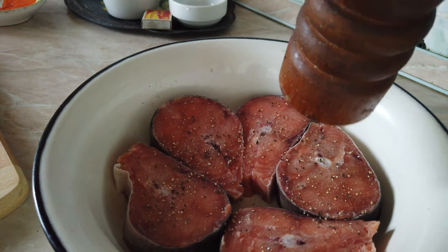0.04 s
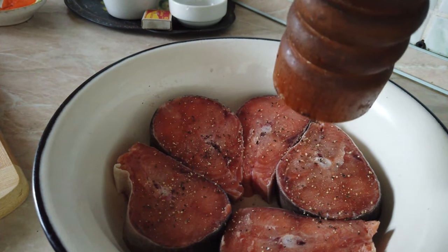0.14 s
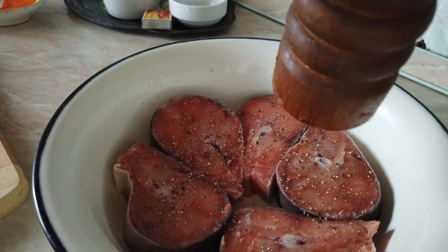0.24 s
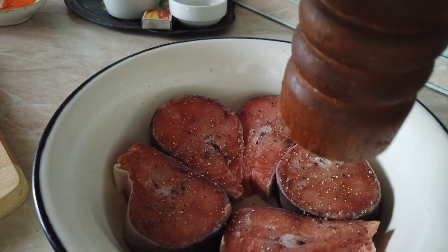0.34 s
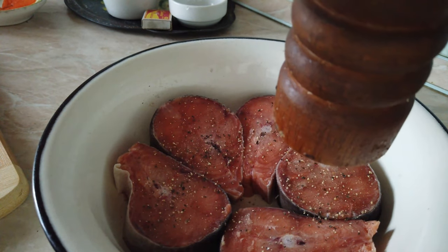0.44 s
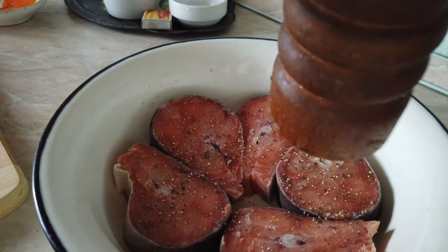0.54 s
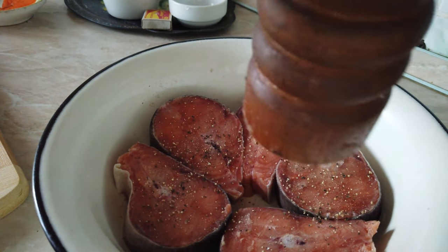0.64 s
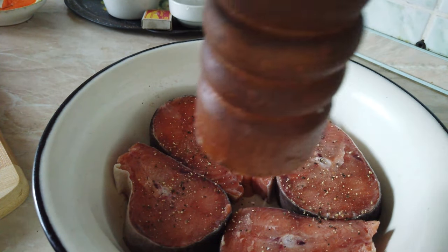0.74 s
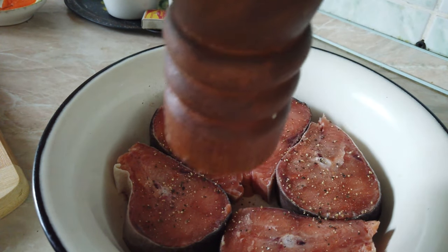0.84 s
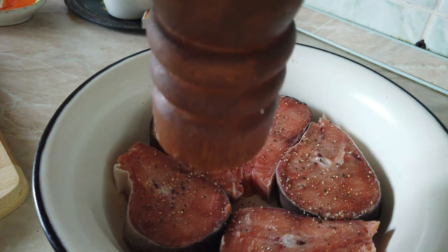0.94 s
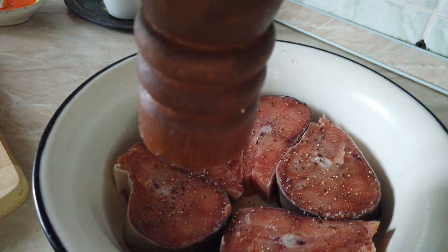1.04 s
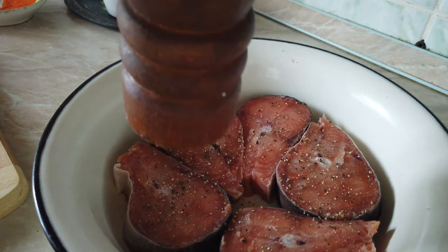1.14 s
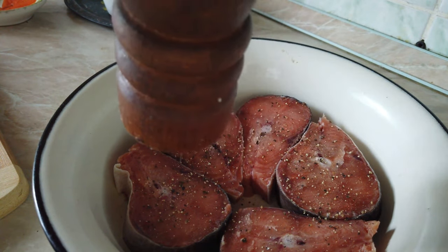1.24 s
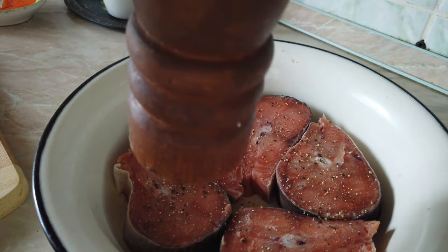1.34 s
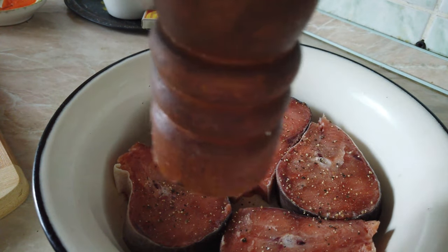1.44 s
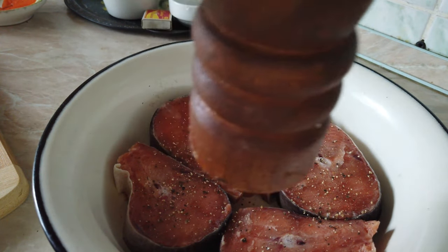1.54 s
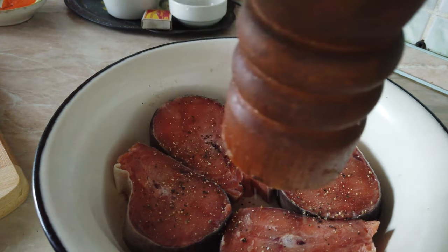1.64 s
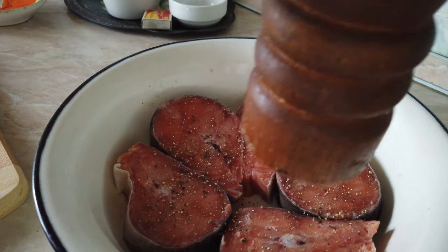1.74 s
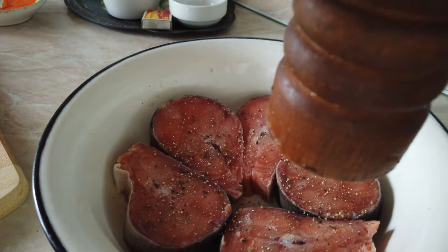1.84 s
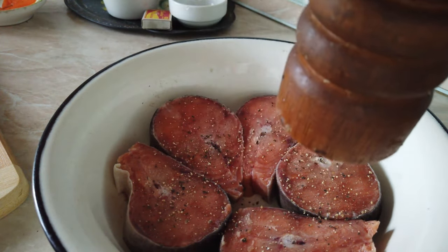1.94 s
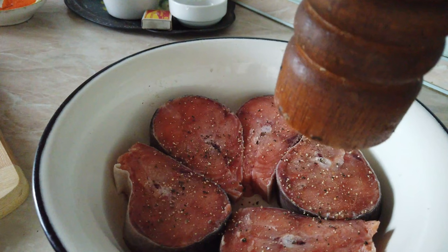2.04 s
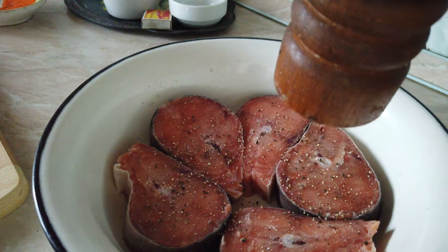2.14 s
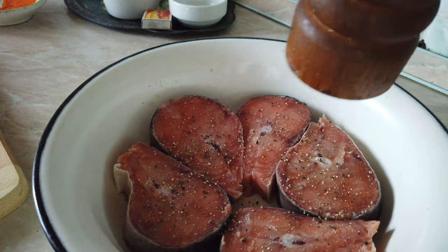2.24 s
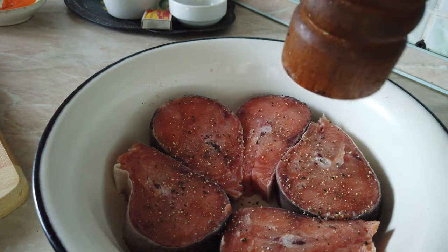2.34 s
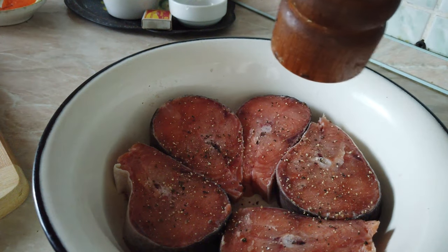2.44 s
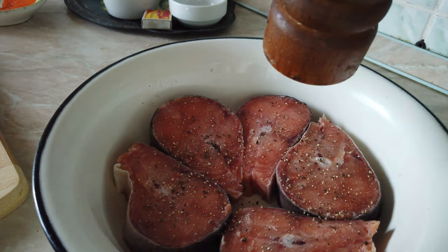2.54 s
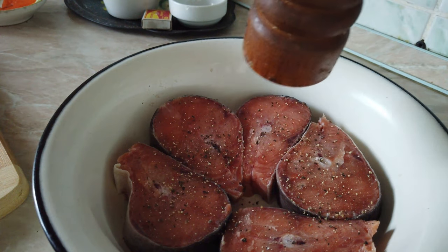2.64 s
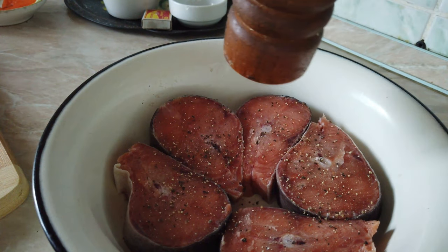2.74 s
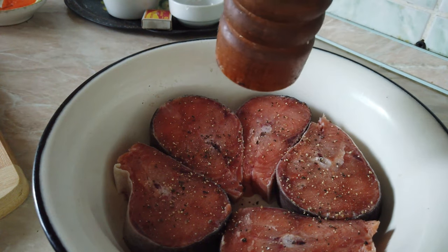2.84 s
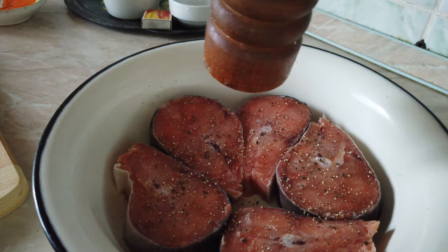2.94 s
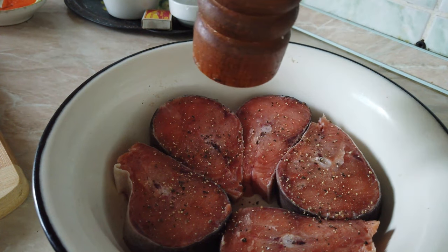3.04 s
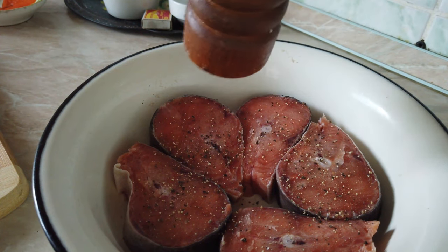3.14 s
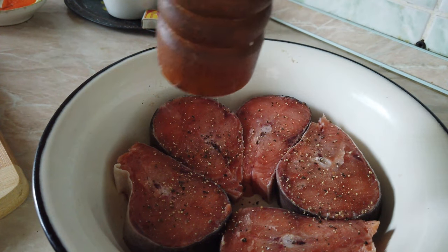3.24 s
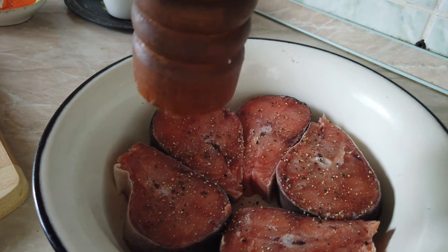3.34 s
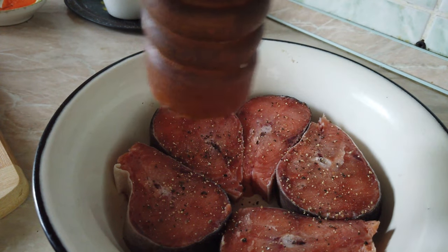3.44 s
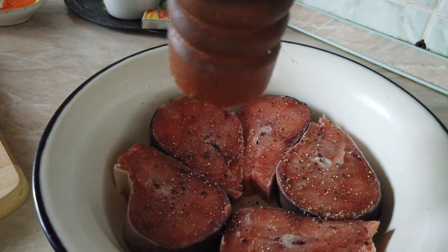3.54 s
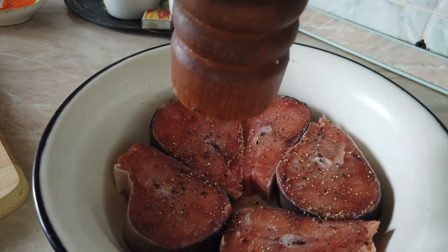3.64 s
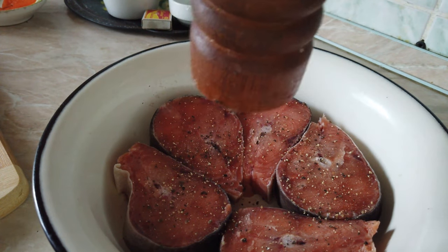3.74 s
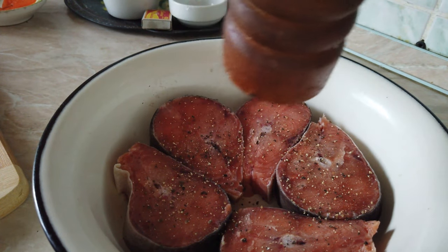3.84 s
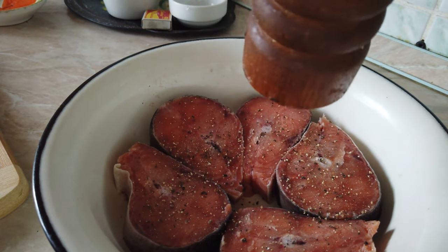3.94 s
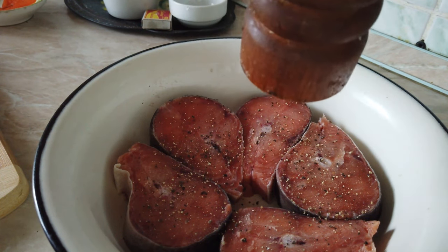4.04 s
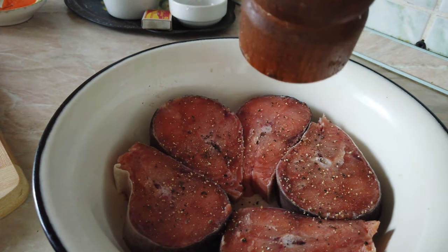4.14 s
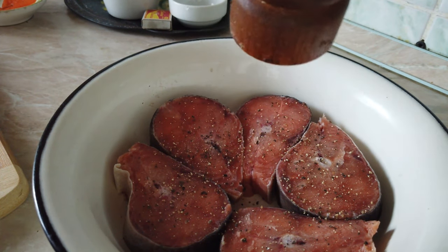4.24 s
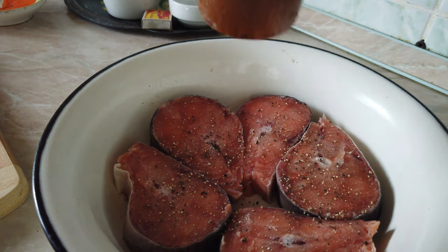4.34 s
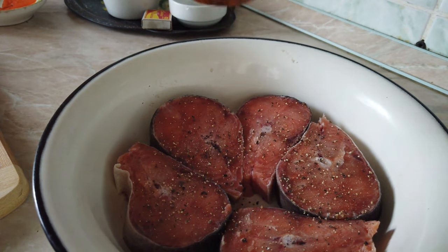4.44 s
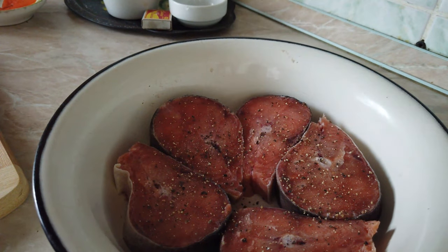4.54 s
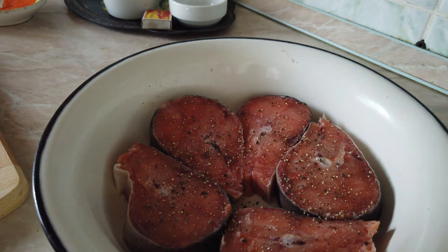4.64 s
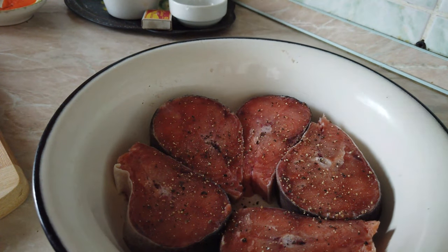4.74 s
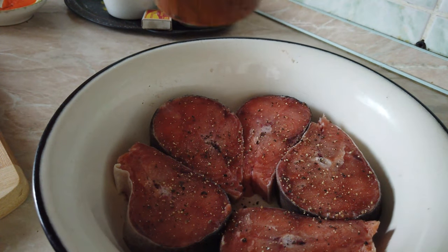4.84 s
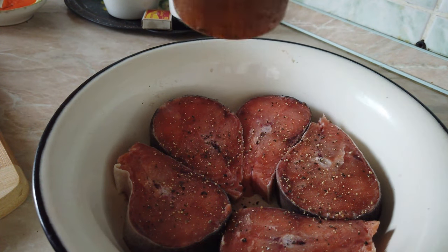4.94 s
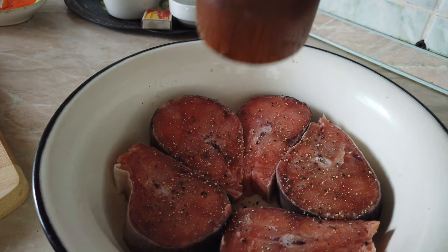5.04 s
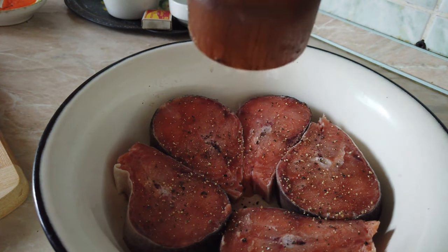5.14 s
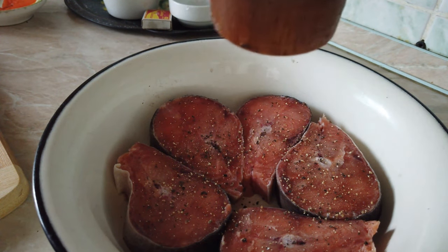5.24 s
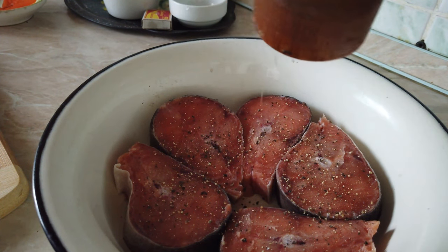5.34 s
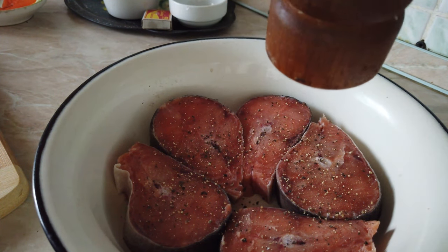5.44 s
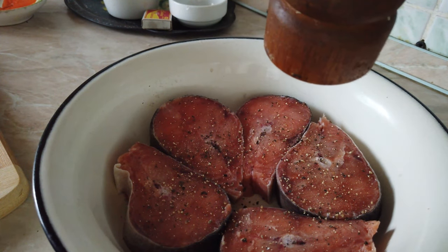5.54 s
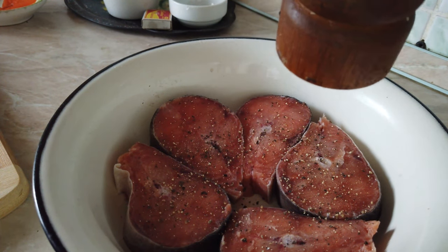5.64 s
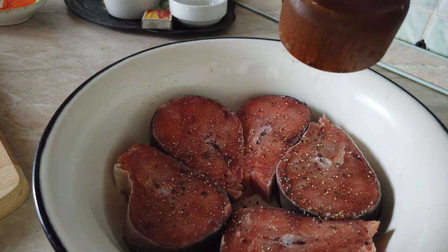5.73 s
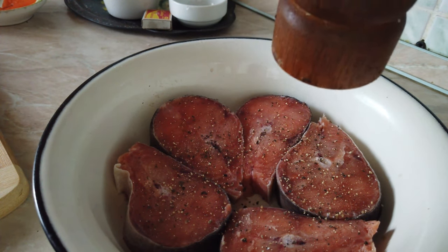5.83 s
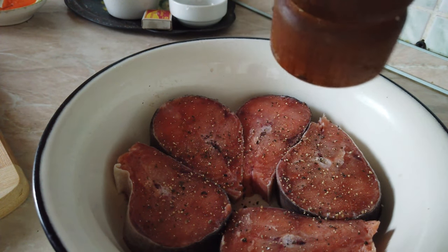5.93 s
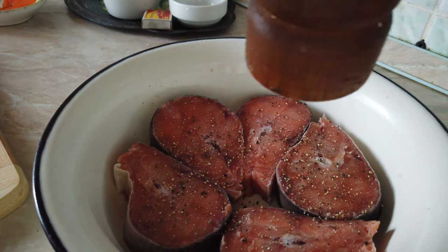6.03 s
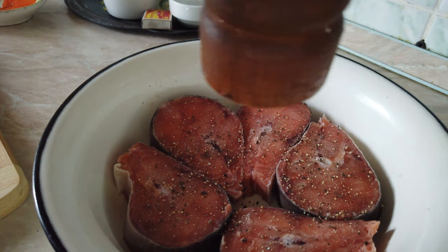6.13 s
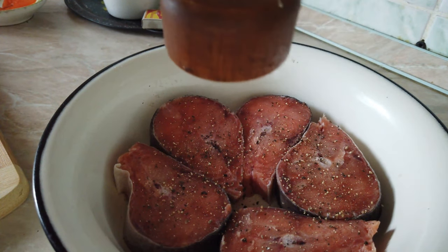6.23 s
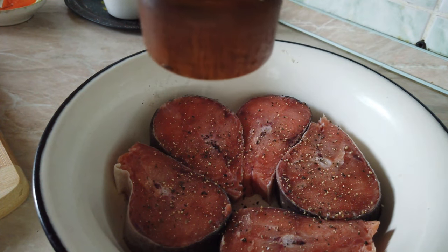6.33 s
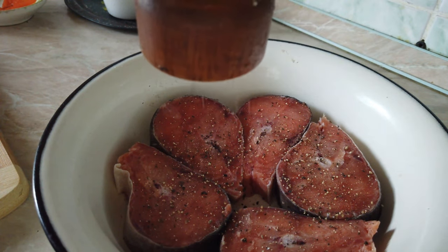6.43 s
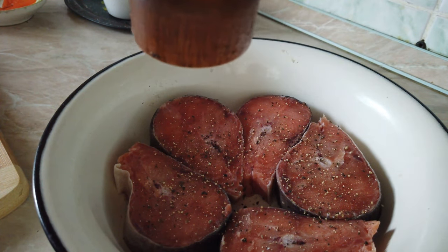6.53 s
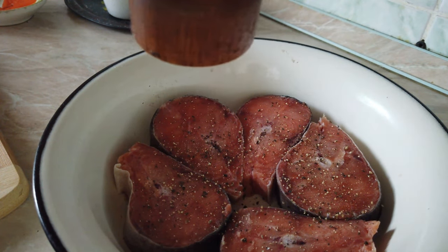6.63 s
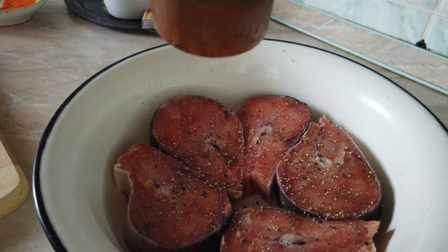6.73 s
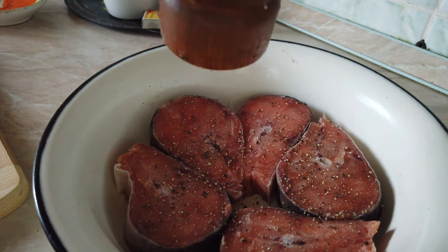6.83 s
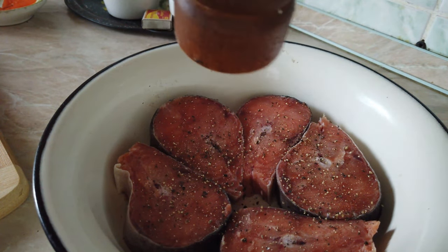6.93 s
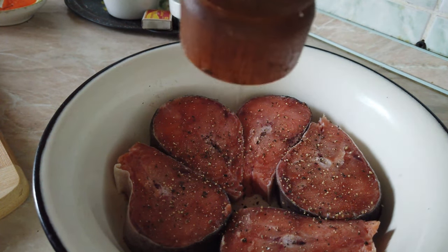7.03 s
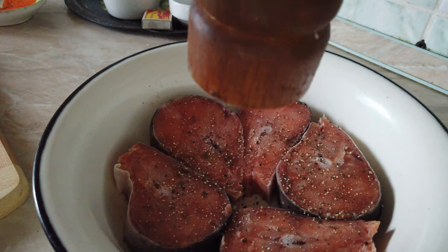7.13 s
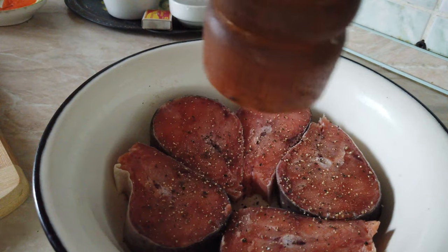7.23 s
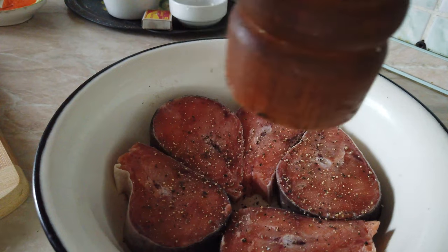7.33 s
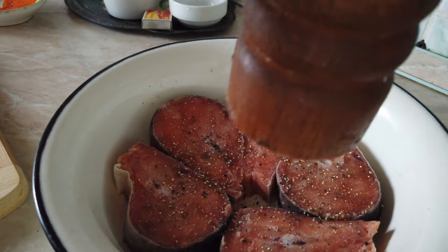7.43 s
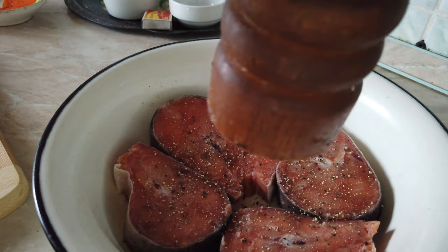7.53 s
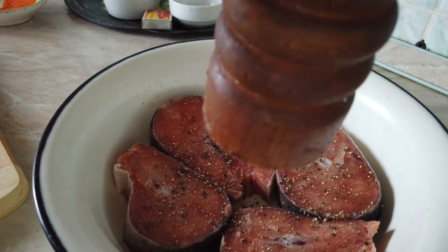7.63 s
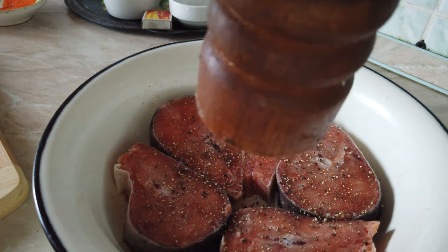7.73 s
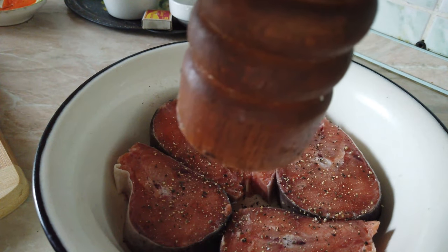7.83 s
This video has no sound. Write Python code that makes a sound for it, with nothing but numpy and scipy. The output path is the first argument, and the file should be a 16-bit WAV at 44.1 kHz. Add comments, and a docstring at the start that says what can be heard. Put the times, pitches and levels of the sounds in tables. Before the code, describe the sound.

A wooden pepper mill is twisted in quick, dry, crunching strokes about three times a second, with one short pause, in a small kitchen.

```python
"""A wooden pepper mill is twisted about three times a second over an enamel dish, with one pause.
Each twist drives a dense run of random fractures through the resonances of wood, chamber and burr;
whole corns snap as sharp clicks that ring the burr. Around the twists the loose top knocks, rubs and
faintly squeaks, and in the pause the hand rubs on the mill. Dish, worktop and the walls of a small
kitchen add short echoes, over faint air noise and a low rumble."""
import sys
import numpy as np
from scipy import signal
from scipy.fft import rfft, irfft
from scipy.io import wavfile

SR = 44100
rng = np.random.default_rng(int(sys.argv[2]) if len(sys.argv) > 2 else 0)


def to_wav(sig):
    """Store sig (one row per channel, or 1-D mono) as 16-bit WAV at the path in sys.argv[1].

    Samples outside -1..1 are clipped; the rate is SR.
    """
    pcm = np.clip(np.atleast_2d(sig), -1, 1) * 32767
    pcm = np.round(pcm).astype(np.int16)
    wavfile.write(sys.argv[1], SR, pcm.T)  # frames by channels


N = 347508  # length in samples


def undb(db):
    """Amplitude gain is the antilogarithm of a twentieth of the level in decibels."""
    return 10 ** (np.asarray(db) / 20)


def unit(x):
    """Energy normalisation: the mean energy per channel becomes one."""
    channels = len(np.atleast_2d(x))
    return x / np.sqrt(np.sum(x ** 2) / channels + 1e-18)


def add(track, start_s, x):
    """Superposition: the pressure of x adds to the track from start_s, cut at both ends."""
    i = int(start_s * SR)
    x, i = x[max(-i, 0):], max(i, 0)
    x = x[:max(N - i, 0)]
    track[i:i + len(x)] += x


def filtered(x, order, hz, kind):
    """Butterworth filtering: a maximally flat passband with a smooth roll-off."""
    return signal.sosfilt(signal.butter(order, hz, kind, fs=SR, output="sos"), x)


def stereo_noise(count, alike_hz):
    """Diffuse-field coherence: two channels agree in the bass and are unrelated in the treble."""
    f = np.arange(count // 2 + 1) * SR / count
    likeness = 1 / (1 + (f / alike_hz) ** 2)
    mid, side = rfft(rng.standard_normal((2, count)))
    mid = mid * np.sqrt(1 + likeness)
    side = side * np.sqrt(np.maximum(1 - likeness, 0))
    return irfft(np.array([mid + side, mid - side]), count)


def ring(modes, spread, size=2048):
    """Modal superposition: the impulse response of resonances that grip and contact point detune a little."""
    f = np.arange(1, size // 2 + 2) * SR / size
    shifts = np.exp(spread * rng.standard_normal(len(modes)))
    response = 0
    for k, ((hz, width, db), shift) in enumerate(zip(modes, shifts)):
        sign = (-1) ** k  # neighbouring modes alternate in polarity
        detuning = (f * f - (hz * shift) ** 2) / (f * width)
        response = response + sign * undb(db) / (1 + 1j * detuning)
    return unit(irfft(response)[:size // 2])


def grains(count, per_s, scatter_db):
    """Shot noise: random tiny impulses, a few much larger than the rest, with an rms of one."""
    size = undb(scatter_db * np.minimum(rng.exponential(size=count), 3))
    happens = rng.random(count) < per_s / SR
    clicks = happens * size * rng.choice([-1, 1], count)
    return unit(clicks) * np.sqrt(count)


def catches(t, per_s, depth_db):
    """Stick-slip modulation: a gain that wanders at random between catching and slipping."""
    steps = rng.standard_normal(64)
    return undb(depth_db * np.interp((t - t[0]) * per_s, np.arange(len(steps)), steps - steps.mean()))


def slide(length_s):
    """Light dry friction: sparse contacts whose rate is steady while their strength swells and fades."""
    count = int(length_s * SR)
    return grains(count, per_s=900, scatter_db=2.5) * signal.windows.tukey(count, .5)


# Spectrum of still kitchen air. Each row: frequency in Hz, relative spectral level in dB.
AIR_SPECTRUM = [(25, -1), (45, -6), (70, 0), (110, -11.5), (170, -18), (300, -14.5), (700, -21.5),
                (1500, -28), (2700, -18.5), (5000, -23), (9000, -30.5), (16000, -39.5)]


def air(level_db=-73.5):
    """Stationary coloured noise: random phases under a fixed spectrum give rumble and hiss."""
    hz, db = np.transpose(AIR_SPECTRUM)
    f = np.arange(1, N // 2 + 2) * SR / N
    colour = undb(np.interp(np.log(f), np.log(hz), db))
    x = irfft(rfft(stereo_noise(N, alike_hz=556)) * colour, N)
    return unit(x) * np.sqrt(N) * undb(level_db)


# Course of the low rumble. Each row: time in seconds, level in dB.
RUMBLE_LEVEL = [(0, -84), (2.5, -79), (3.3, -76), (4.3, -84), (6.002, -82), (6.7, -73.5), (7.8, -74)]


def rumble(bottom_hz=20, top_hz=45):
    """Band-limited noise under a slow envelope, partly different in the two channels."""
    x = filtered(stereo_noise(N, alike_hz=25), 2, [bottom_hz, top_hz], "band")
    level_db = np.interp(np.arange(N) / SR, *np.transpose(RUMBLE_LEVEL))
    return unit(x) * np.sqrt(N) * undb(level_db)


# Reverberation of the kitchen by band. Each row: centre in Hz, 60 dB decay time in seconds,
# relative starting level in dB.
KITCHEN_BANDS = [(148, 0.36, -8), (400, 0.28, -0.5), (980, 0.25, -6.5), (2910, 0.27, 0.5), (6970, 0.21, -3),
                 (15000, 0.12, 4.5)]


def kitchen_echo(size=22050, build_up_s=0.0052):
    """Statistical reverberation: the walls return dense noise, each band with its own exponential decay."""
    t = np.arange(size) / SR
    f = np.arange(1, size // 2 + 2) * SR / size
    noise = rfft(stereo_noise(size, alike_hz=1620))
    centres = np.log(np.array(KITCHEN_BANDS)[:, 0])
    tail = 0
    for share, (_, t60, db) in zip(np.eye(len(KITCHEN_BANDS)), KITCHEN_BANDS):
        band = irfft(noise * np.interp(np.log(f), centres, share))
        tail = tail + band * undb(db - 60 * t / t60)
    return unit(tail * (1 - np.exp(-t / build_up_s)))


def dish_echo(x, decay_s=0.0029, build_up_s=0.0002, bend_hz=800, size=8192):
    """Scattering: dish and worktop smear the treble as the mill moves; long waves return in step."""
    bass = filtered(x, 1, bend_hz, "low")
    treble = np.pad(filtered(x, 2, bend_hz, "high"), 2 * size)
    t = np.arange(1024) / SR
    envelope = np.exp(-t / decay_s) * (1 - np.exp(-t / build_up_s))
    fade = signal.windows.cosine(2 * size)
    out = np.zeros((2, N))
    for i in range(-size, N, size):  # overlapping stretches, each with new scattering paths
        paths = unit(stereo_noise(len(t), alike_hz=505) * envelope)
        part = treble[i + 2 * size:][:len(fade)] * fade
        for channel, path in zip(out, paths):
            add(channel, i / SR, signal.fftconvolve(part, path))
    return out + .5 * bass


def placed(x, walls, direct_db, dish_db, walls_db, lag_s=.00002):
    """Interaural delay and echo: the mill lies slightly nearer the left, so the right hears it later."""
    f = np.arange(N // 2 + 1) * SR / N
    late = irfft(rfft(x) * np.exp(-2j * np.pi * f * lag_s), N)
    echo = signal.fftconvolve(x[None], walls, axes=1)[:, :N]
    return undb(direct_db) * np.array([x, late]) + undb(dish_db) * dish_echo(x) + undb(walls_db) * echo


# Resonances of the enamel dish. Each row: frequency in Hz, bandwidth in Hz, relative level in dB.
DISH_MODES = [(336.6, 50, -4), (943, 28, 5), (2605, 50, -4)]


def dish_singing(sound):
    """Sympathetic resonance: the dish answers whatever falls on its modes."""
    response = ring(DISH_MODES, spread=0, size=16384)
    return signal.fftconvolve(sound, response[None], axes=1)[:, :N]


# The hand shifting in the pause: start in seconds, length in seconds, relative level in dB.
HAND_SHIFT = (4.41, 0.37, -79.5)
# Resonances of that rub. Each row: frequency in Hz, bandwidth in Hz, relative level in dB.
HAND_MODES = [(1840, 280, 1), (3170, 300, -1.5), (3500, 280, 0), (7700, 230, -14.5)]


def shifting():
    """Intermittent friction: the hand rubs in fits along the resting mill and stirs its resonances."""
    out = np.zeros(N)
    start, length, db = HAND_SHIFT
    rub = slide(length)
    rub = rub * catches(np.arange(len(rub)) / SR, per_s=42, depth_db=3.5)
    add(out, start, undb(db) * signal.fftconvolve(rub, ring(HAND_MODES, spread=0.0082)))
    return out


# Faint squeaks of the steel shaft. Each row: middle in seconds, relative level in dB.
SHAFT_SQUEAKS = [(.255, -60), (.485, -68), (1.16, -61.5), (1.731, -61), (6.517, -55), (6.63, -61),
                 (7.56, -65), (7.641, -59), (7.864, -49)]


def squeaking(hz=7150, width_hz=170, length_s=0.039):
    """Stick-slip excitation: slips of the shaft swell one narrow steel resonance."""
    out, count = np.zeros(N), int(length_s * SR)
    for middle, db in SHAFT_SQUEAKS:
        slips = grains(count, per_s=3000, scatter_db=0) * np.hanning(count)
        steel = ring([(hz, width_hz, 0)], spread=0.027)
        steel_twice = unit(signal.fftconvolve(steel, steel))  # narrower, with a softer onset
        add(out, middle - length_s / 2, undb(db) * signal.fftconvolve(slips, steel_twice))
    return out


# Resonances of the wooden body, the grinding chamber and the burr.
# Each row: frequency in Hz, bandwidth in Hz, relative level in dB.
WOOD_MODES = [(141, 31.6, -4.5), (222.5, 89, -3), (315.7, 66.3, 2), (500, 152, 0.5), (585.6, 95, 4.5),
              (765, 130, 0.5), (950, 100, 3), (1172, 240, 2), (1348, 147, 6), (1483, 255, 3.5),
              (2190, 246, -5)]
CHAMBER_MODES = [(2580, 372, -4), (2774, 174, 3), (3360, 1780, -8), (4020, 58, 0.5), (4500, 370, -69)]
BURR_MODES = [(4875, 2530, -16), (6430, 240, -8), (6490, 310, -15.5), (7520, 250, -4.5), (7810, 407, -6),
              (8440, 480, -2), (9170, 1600, -8), (12760, 9300, -20), (15800, 2400, -20.5)]


def mill(push, crisp_db, chamber_db, spread):
    """Contact hardness: crisper contacts excite more of chamber and burr beside the wooden body."""
    parts = [(WOOD_MODES, 0), (CHAMBER_MODES, chamber_db + 0.69 * crisp_db), (BURR_MODES, crisp_db)]
    return sum(signal.fftconvolve(push * undb(db), ring(modes, spread)) for modes, db in parts)


def rubbing(crisp_db=-5, gain_db=-3):
    """Sliding friction: the unloaded top rubs over dry wood and pepper dust before and after each twist."""
    take_up_s = .06  # the top takes up its slack just before the bite
    regrip_s, slide_back_s = 0.028, 0.12  # after a twist the hand waits, then turns back
    out = np.zeros(N)
    for start, length, _, _, take_up_db, back_db in MILL_TWISTS:
        slides = [(start - take_up_s, take_up_s, take_up_db),
                  (start + length + regrip_s, slide_back_s, back_db)]
        for s, span, db in slides:
            add(out, s, undb(db + gain_db) * mill(slide(span), crisp_db, chamber_db=-1, spread=0.048))
    return filtered(out, 1, 350, "high")


# The top and shaft knocking in the wood. Each row: start in seconds, relative level in dB,
# relative crispness (treble against body) in dB.
TOP_KNOCKS = [(0.196, -38.5, -18), (0.255, -44.5, -2.5), (0.293, -32, -16), (0.335, -28.5, -45),
              (0.36, -23.5, -15.5), (0.481, -33, -17.5), (0.641, -20.5, -16.5), (0.7913, -30.5, -10),
              (0.856, -35, -23), (1.149, -37.5, -18), (1.322, -28.5, -7.5), (1.437, -54.5, 4.5),
              (1.583, -34, -10), (1.753, -35.5, -15.5), (1.85, -40.5, -11), (1.915, -24, -10.5),
              (2.062, -51, -0.5), (2.102, -35.5, -15.5), (2.181, -38, -15), (2.259, -22.5, -40),
              (2.417, -30.5, -16), (2.441, -30, -13), (2.7, -39, -9), (2.834, -30, -16.5),
              (3.179, -35, -2.5), (3.35, -39.5, -11.5), (3.573, -21.5, -12), (3.648, -33, -13.5),
              (3.743, -40.5, -9.5), (4.054, -37.5, -16.5), (4.069, -39.5, -9), (4.1608, -30.5, -12.5),
              (4.341, -35, -12), (4.508, -57.5, -12), (4.777, -51.5, -22), (4.847, -40.5, -6.5),
              (5.192, -30.5, -10.5), (5.25, -36.5, -18), (5.544, -38, -22), (5.652, -58.5, 13),
              (5.678, -28, -13.5), (5.709, -25.5, -2.5), (5.965, -30.5, -15.5), (6.024, -25, -15),
              (6.304, -57, 0), (6.339, -29.5, -16), (6.55, -38.5, -9.5), (6.665, -29, -18),
              (6.832, -30, -7), (6.952, -43.5, -16), (7.024, -27.5, -2), (7.273, -41, -18),
              (7.346, -21.5, -17), (7.365, -29, -18), (7.49, -38, -28), (7.694, -32, -28),
              (7.764, -29, 1.5)]


def knocking(gain_db=4, crispen_db=7.5, chatter_s=0.0057, chatter_db=-2, low_hz=450):
    """Impact excitation: the loose top hits its seat, then chatters with an exponential decay."""
    out, t = np.zeros(N), np.arange(900) / SR
    for start, db, crisp_db in TOP_KNOCKS:
        chatter = grains(len(t), per_s=2500, scatter_db=2) * np.exp(-t / chatter_s)
        push = undb(chatter_db) * unit(chatter)
        push[0] += 1  # the first hit
        push = filtered(push, 1, low_hz, "high")  # light parts stir little bass
        knock = mill(push, crisp_db + crispen_db, chamber_db=1, spread=0.026)
        add(out, start, undb(db + gain_db) * knock)
    return out


# Whole corns snapping. Each row: time in seconds, relative peak level in dB, main ring in Hz.
CORN_CRACKS = [(0.031, -28, 7870), (0.6754, -22, 8200), (0.959, -23.5, 8500), (0.9822, -16, 8550),
               (1.6064, -20.5, 8100), (1.6153, -19, 8400), (1.645, -16, 8150), (1.9775, -28, 8000),
               (2.3256, -19.5, 8200), (2.561, -23, 9040), (2.5824, -16, 9000), (2.596, -18, 7800),
               (2.6384, -18, 8200), (2.9252, -14, 7660), (2.9366, -20, 7740), (2.9754, -17, 7560),
               (3.1982, -16.5, 7750), (3.237, -20, 8400), (3.2395, -14, 7970), (3.5433, -15, 6200),
               (3.607, -13.5, 8600), (3.8884, -18, 8200), (3.8992, -20, 8400), (3.938, -19.5, 8700),
               (3.945, -24, 8200), (3.9535, -21, 8800), (3.9759, -24, 8170), (4.243, -29, 6140),
               (4.2498, -24, 6030), (4.2613, -23.5, 7600), (4.9966, -18, 8220), (5.008, -18.5, 8200),
               (5.0318, -18.5, 8000), (5.0464, -25, 5900), (5.3747, -17, 8000), (5.7086, -21.5, 8740),
               (5.7432, -17, 8360), (6.056, -18.5, 8300), (6.396, -21, 5770), (6.729, -20.5, 7850),
               (7.007, -33, 9100), (7.0228, -17.5, 7950)]


def cracking(splinter_s=0.00056, splinter_db=-9, delay_s=0.00056):
    """Brittle fracture: a click and a brief burst of splinters ring the burr at each corn's own pitch."""
    out, t = np.zeros(N), np.arange(256) / SR
    splinter_envelope = np.exp(-t / splinter_s) * t / (t + splinter_s)
    for s, db, hz in CORN_CRACKS:
        snap = undb(splinter_db) * rng.standard_normal(len(t)) * splinter_envelope
        snap[0] = 1
        modes = [(2600, 600, -11), (6100, 600, -7), (hz, 900, 0), (9300, 1500, -15), (13000, 4000, -18)]
        x = signal.fftconvolve(snap, ring(modes, spread=0.017))
        add(out, s + delay_s, x * undb(db) / np.abs(x).max())
    return out


# The twists. Each row: start in seconds, length in seconds, relative force as level in dB,
# relative crispness (treble against body) in dB, relative level in dB of the take-up rub before it,
# relative level in dB of the slide back after it.
MILL_TWISTS = [ (-0.02, 0.076, -40, 0.5, -63, -75), (0.289, .11, -46, -9, -64.5, -70.5),
               (0.634, 0.086, -41.5, -5, -59, -66.5), (0.956, 0.075, -42.5, -1, -62, -70),
               (1.286, 0.088, -47, 0, -58.5, -85), (1.592, 0.067, -46.5, 4, -72.5, -72),
               (1.907, 0.071, -52, 0.5, -62.5, -68), (2.246, 0.091, -45.5, 2, -59.5, -65),
               (2.558, 0.093, -44.5, 3, -60.5, -68.5), (2.88, 0.1, -45, 4.5, -62.5, -76),
               (3.198, 0.064, -43.5, 1.5, -71, -79.5), (3.531, 0.054, -43.5, 6, -70, -67),
               (3.882, 0.097, -45, 0, -57, -74), (4.205, 0.058, -45.5, 3, -53, -83),
               (5.0, 0.082, -45.5, 1.5, -72, -69), (5.338, 0.12, -47, -2, -68.5, -75),
               (5.693, 0.081, -44.5, -0.5, -56.5, -75.5), (6.017, 0.081, -40.5, 0.5, -55.5, -99),
               (6.342, 0.067, -42, 0.5, -69, -58.5), (6.666, .112, -43, -4.5, -59, -74),
               (7.004, 0.09, -40, -3.5, -61, -74.5), (7.338, 0.077, -40.5, -8, -69, -72.5),
               (7.687, .105, -39.5, -5.5, -69, -57.5)]


def grinding(body_db=-3.5, burr_db=3):
    """Granular excitation: each twist bites, drags the burr through ever finer pepper and lets go."""
    bite_s, release_s = .03, 0.024  # the burr swells into the pepper around the start, then lets go
    sag_db_per_s, crispen_db_per_s = 62.5, 30.5  # smaller pieces: less force, finer crunch
    out = np.zeros(N)
    for start, length, force_db, crisp_db, _, _ in MILL_TWISTS:
        t = np.arange(-bite_s / 2, length + release_s, 1 / SR)
        bite = np.minimum(t / bite_s + .5, 1) ** 2
        release = np.minimum((length + release_s - t) / release_s, 1)
        from_middle = t - length / 2
        force = bite * release * undb(force_db + body_db - sag_db_per_s * from_middle)
        crushing = grains(len(t), per_s=2400, scatter_db=4.5) * catches(t, per_s=260, depth_db=2)
        push = unit(crushing) * np.sqrt(len(t)) * force
        crisp = crisp_db + burr_db + crispen_db_per_s * from_middle
        add(out, start + t[0], mill(push, crisp, chamber_db=-2, spread=0.028))
    return out


def scene(sing_db=-19):
    """Directivity: cracks shoot straight from the mill's mouth, the body radiates all round into the room."""
    walls = kitchen_echo()
    crunch = placed(grinding(), walls, direct_db=-3, dish_db=0, walls_db=-5)
    cracks = placed(cracking(), walls, direct_db=2, dish_db=-2.5, walls_db=-7.5)
    handled = knocking() + rubbing() + shifting() + squeaking()
    handling = placed(handled, walls, direct_db=-1, dish_db=3.5, walls_db=0)
    sound = crunch + cracks + handling
    return sound + undb(sing_db) * dish_singing(sound) + air() + rumble()


def record(dry, top_hz=16100):
    """Band limitation: a steep elliptic low-pass removes the highest treble."""
    return signal.sosfilt(signal.ellip(8, .2, 70, top_hz, fs=SR, output="sos"), dry)


dry = scene()
out = record(dry)
to_wav(out)
```